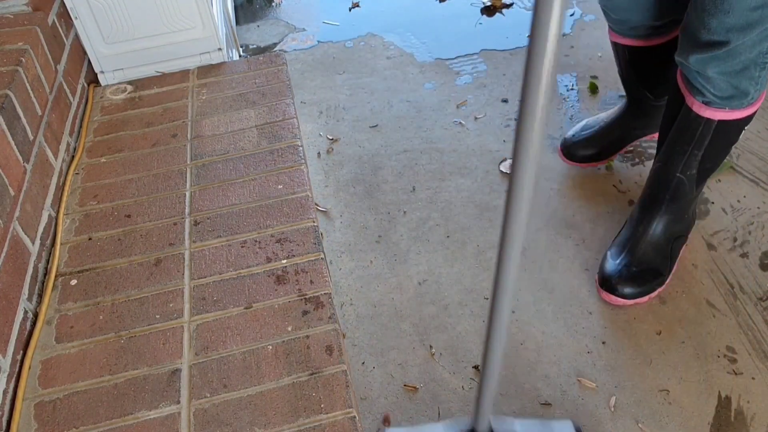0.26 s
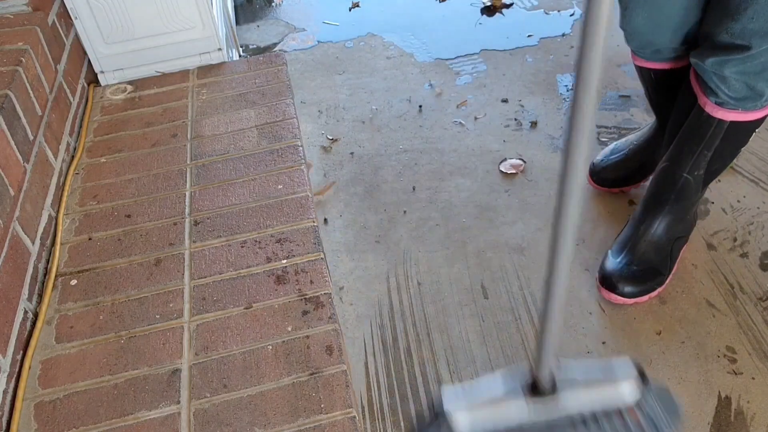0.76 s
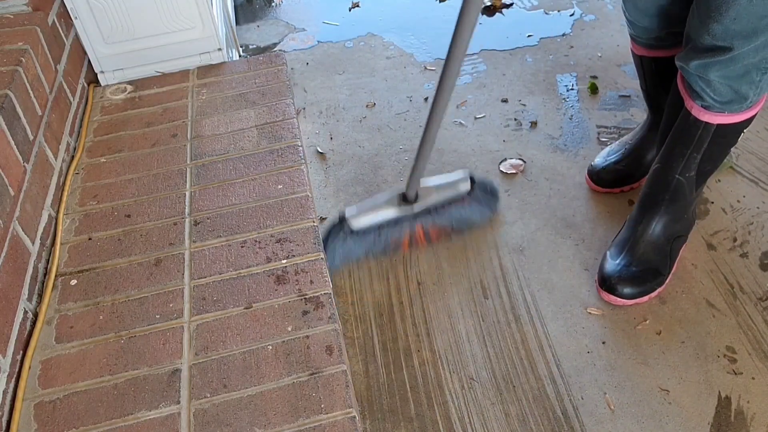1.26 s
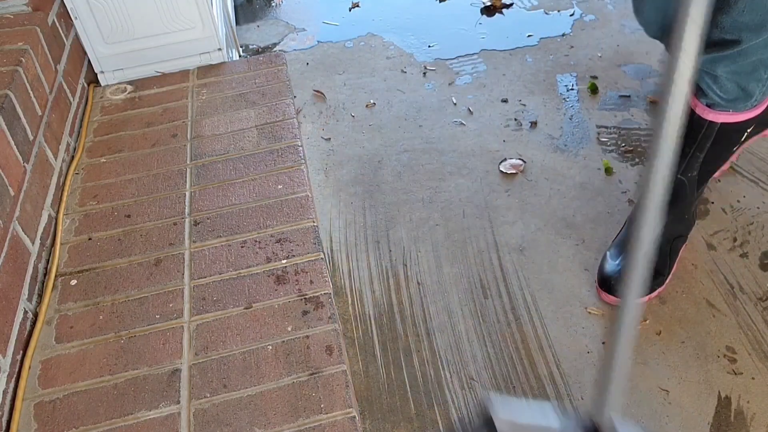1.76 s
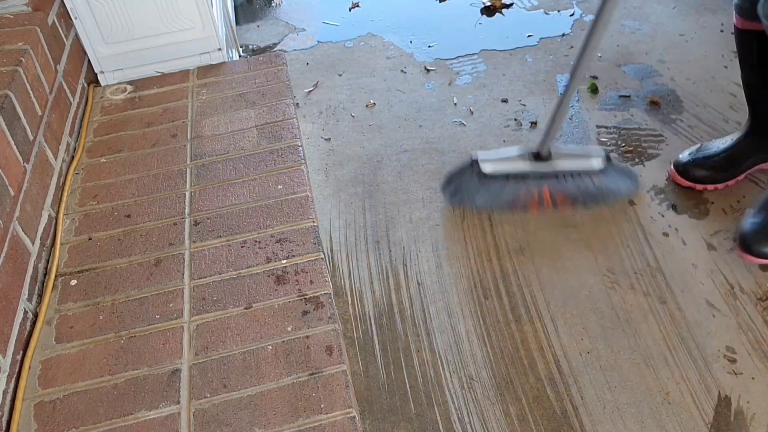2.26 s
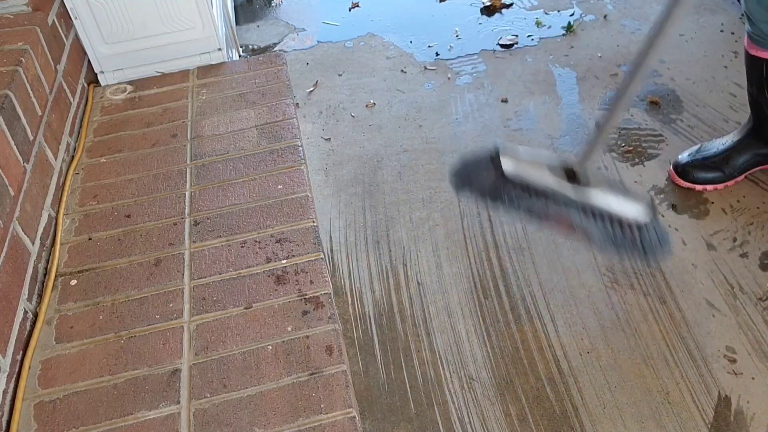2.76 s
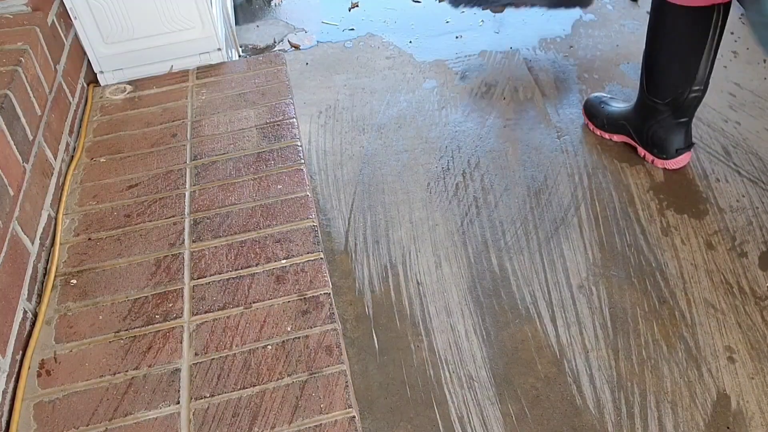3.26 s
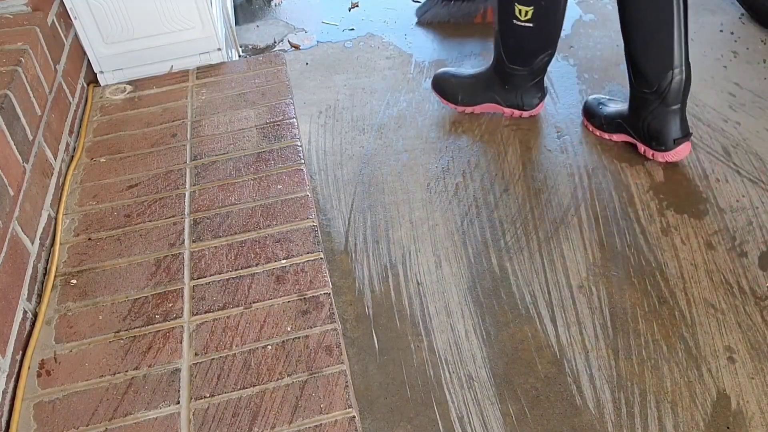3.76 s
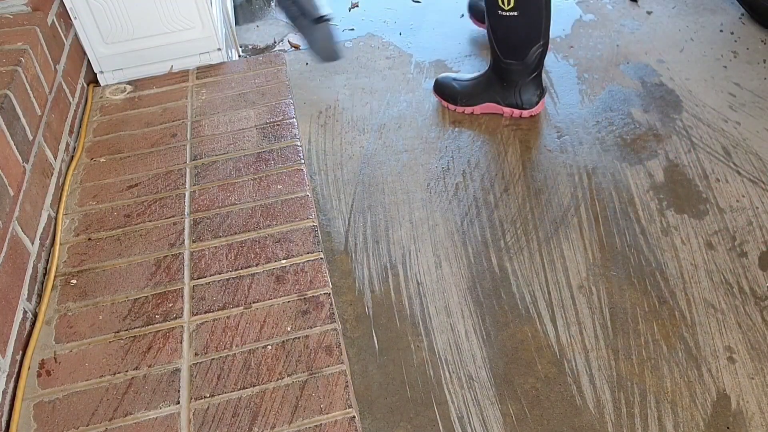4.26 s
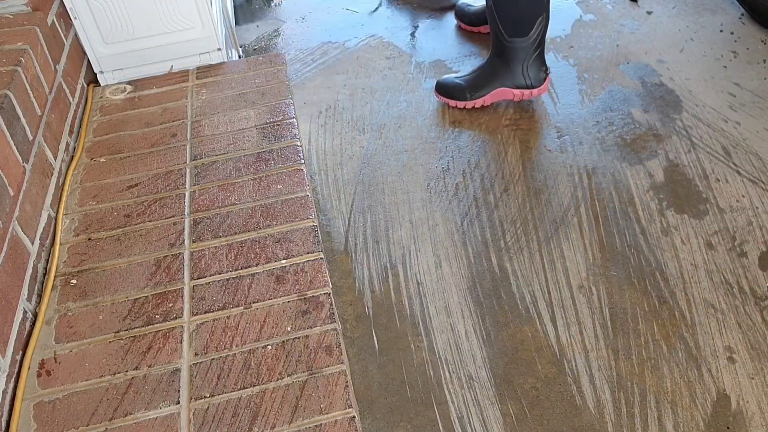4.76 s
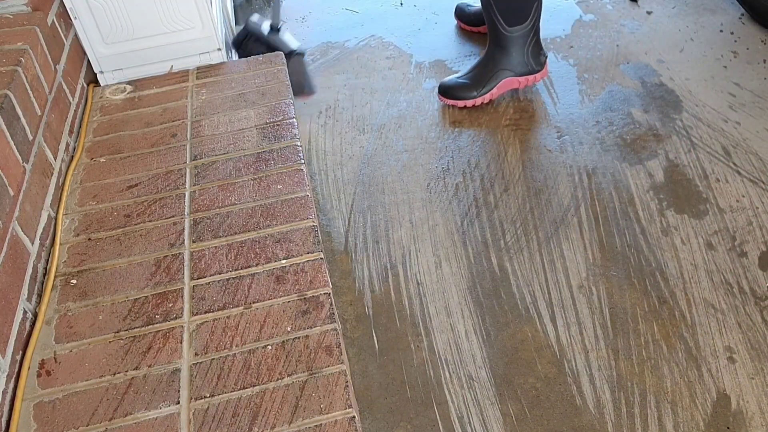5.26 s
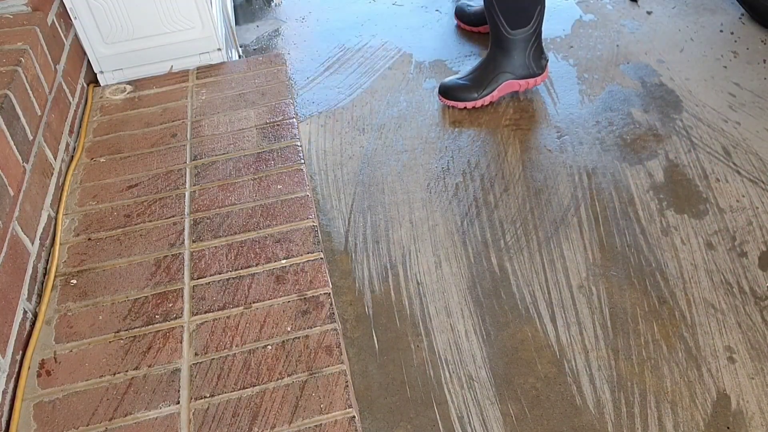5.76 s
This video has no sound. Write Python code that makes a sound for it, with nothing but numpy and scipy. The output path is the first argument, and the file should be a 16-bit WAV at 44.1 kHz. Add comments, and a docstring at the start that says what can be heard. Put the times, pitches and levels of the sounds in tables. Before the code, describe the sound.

Close to the microphone, a stiff push broom sweeps wet concrete in separate strokes, hissing brightly with fine spray. Early on, the head knocks hard in a quick clatter with a short metallic ring. Wet slaps and squelches follow, and the later strokes sound wetter and stronger. Rubber boots shuffle softly; low air puffs and a quiet outdoor wash lie beneath.

```python
"""A push broom sweeps water over wet concrete on a patio, stroke after stroke, close to the microphone.
Bristles hiss as ticks and noise; spray and slosh are mostly tiny bubbles and noise, with slaps and squelches.
The head knocks and the metal handle rings: decaying tones, in one tight cluster and faintly near the end.
Rubber boots shuffle in short noise bursts, low air noise buffets the microphone over a steady yard wash,
and the sound drops out for an instant between two strokes."""
import sys
import numpy as np
from scipy import signal
from scipy.fft import rfft, irfft
from scipy.io import wavfile

SR = 44100
rng = np.random.default_rng(int(sys.argv[2]) if len(sys.argv) > 2 else 0)


def bounce(signal):
    """Save signal as a 16-bit WAV file at the path given by the first command-line argument."""
    frames = np.transpose(np.atleast_2d(signal))
    limited = np.clip(frames, -1, 1)
    pcm = np.round(limited * 32767).astype(np.int16)
    wavfile.write(sys.argv[1], SR, pcm)


N = 264600  # samples: six seconds
T, HZ = np.arange(N) / SR, np.fft.rfftfreq(N, 1 / SR)  # time in s, frequency in Hz

# Where marked "relative", a level is set against others in its layer; a trim on the whole layer follows.
# Strokes of the broom, from touch-down to lift, relative: start_s, attack_s, push_s, follow_through_s,
# peak_db, swell_db (start below peak), ease_db (end below peak), spray_db and slosh_db (against bristles)
STROKES = [(.36, 0.071, 0.37, 0.11, -44, 8, 8, 2, -19), (1.28, 0.063, 0.29, 0.17, -45.5, 1, 6, -6, -10),
           (2.3, 0.092, 0.34, 0.26, -43.5, 1.5, 10, -5, -20),
           (3.24, .02, 0.041, 0.22, -42.5, 5, 20, -7.5, -21.5),
           (3.83, 0.1, .3, 0.11, -43.5, 19.5, 7, -8, -15),
           (4.294, 0.016, 0.057, .03, -53, 1.5, 3.5, 4.5, 2.5),
           (4.68, 0.063, 0.37, 0.16, -39.5, 26, 9, 2, -13), (5.68, .06, 0.43, .15, -40, 8, 8, 2.5, -21)]
LIFT_S = 0.048  # a stroke dies away as the bristles lift
# Fizz of the wet floor between strokes, relative: time_s, level_db
FILM_FIZZ = [(0, -67.5), (.35, -68.5), (1.0, -64.5), (1.9, -68.5), (3.1, -63), (3.7, -77), (4.6, -74),
             (5.4, -63), (5.62, -67)]
FILM_SPRAY_DB, FILM_SLOSH_DB = -1, 0  # against the fizz
# The head ploughs through deeper water, relative: time_s, slosh_db, spray_db, half_length_s
PUDDLES = [(0.72, -53.5, -64, 0.052), (1.523, -52, -66, 0.046), (2.587, -48, -30, 0.014),
           (2.71, -49.5, -58, 0.048), (2.87, -56, -48.5, 0.023), (4.177, -44.5, -43.5, 0.032),
           (4.252, -45.5, -45.5, 0.032), (5.084, -41, -37, 0.033), (5.168, -54.5, -48, 0.056),
           (5.285, -52, -60, 0.025), (5.96, -54, -50, 0.06)]
# Tone colour of the bristle hiss: pitch_hz, level_db (per Hz)
BRISTLE_COLOUR = [(500, -38), (1200, -33), (2500, -17.5), (3500, -9.5), (4500, -3), (7400, 0), (9000, -2),
                  (11000, -2), (13500, 0.5), (15500, -1)]
# Tone colour of the thrown spray: pitch_hz, level_db (per Hz)
SPRAY_COLOUR = [(1500, -40), (3000, -13.5), (4000, -5.5), (5300, 0), (6400, -2), (7400, 1), (8800, -6.5),
                (11000, -25), (16000, -26)]
# Tone colour of the sloshing water: pitch_hz, level_db (per Hz)
SLOSH_COLOUR = [(400, -29), (1100, -9.5), (1700, -9), (2200, -2.5), (2750, -4), (3200, 0), (4000, -1.5),
                (5200, 0), (9000, -25.5)]
# How much louder the left port hears the broom at full lean: pitch_hz, lead_db
LEFT_LEAD = [(500, 6), (3000, 1), (8000, 1.5), (11000, -2), (14000, 6)]
# The bristles catch and judder, shaking the broom hard: time_s, level_db, half_length_s
JUDDERS = [(0.419, -58.5, 0.045), (0.566, -51, 0.035), (1.372, -41.5, 0.033), (2.27, -55, 0.012),
           (3.95, -60.5, 0.03)]
HEAD_SHAKE_DB = -9  # a judder also rings the plastic head, against the handle
SHAKE_DB, BITE_DB, BITE_DECAY_S = -66, 4.5, 0.13  # the handle hums in every stroke, most at first bite
# Wet bristles slap the floor, relative: time_s, level_db, pitch_hz (band centre), decay_s
SLAPS = [(.381, -43, 9800, 0.014), (.962, -59.5, 7000, 0.0082), (1.133, -53, 5000, 0.018),
         (1.408, -36.5, 5000, .014), (2.023, -47.5, 7800, 0.0089), (2.118, -54, 8200, 0.005),
         (2.263, -41.5, 9000, 0.012), (2.599, -24, 9250, .006), (2.84, -46, 6000, 0.013),
         (2.96, -52.5, 11130, 0.014), (3.051, -56, 6950, 0.0055), (3.125, -48, 7500, 0.01),
         (4.482, -57, 7000, 0.027), (5.651, -46.5, 6300, 0.045)]
SLAP_OCTAVES, SLAP_RISE_S = 1.3, 0.0039
# Water squirts from under the bristles, relative: time_s, level_db, pitch_hz (band centre), decay_s
SQUELCHES = [(2.684, -37.5, 7000, .023), (2.925, -47, 5840, .012), (4.365, -45, 6600, .026),
             (5.012, -34.5, 6800, 0.021), (5.062, -26, 6100, .0062), (5.101, -32, 5520, .0076),
             (5.452, -55.5, 7000, .018)]
SQUELCH_OCTAVES, SQUELCH_RISE_SHARE = 0.31, 0.25  # the rise takes this share of the decay time
# The broom knocks and rattles: time_s, head_db, handle_db (strength of the blow to each)
KNOCKS = [(1.3412, -20, -41), (1.3458, -47, -32), (1.366, -28.5, -31), (1.373, -34, -23.5),
          (1.383, -31.5, -45.5), (1.402, -32, -23), (1.4058, -32, -8), (1.408, -26, -30), (1.421, -43, -32),
          (1.435, -41, -33), (1.471, -36.5, -38), (5.659, -54, -64)]
# Ringing tones of the plastic head: pitch_hz, level_db, t60_s (time to fall by 60 dB)
HEAD_MODES = [(175, -13.5, 0.111), (319, -24, 0.074), (422, -9, 0.0645), (532, -6, 0.026),
              (615, 2.5, 0.018), (852, -1, 0.014), (910, -14, 0.26), (952, -0.5, 0.014),
              (1210, -18.5, 0.0343), (1435, -6.5, .04), (3140, -4, 0.019), (4080, -7.5, 0.0145)]
# Ringing tones of the metal handle: pitch_hz, level_db, t60_s (time to fall by 60 dB)
HANDLE_MODES = [(1543.5, 1, 0.051), (1650, -20.5, 0.035), (1480, -23.5, 0.33), (1724, -24.5, 0.29),
                (1716, -31.5, 0.46), (1905, -14, 0.052), (2014, -13, .04), (2644, -12.5, 0.038),
                (2790, -24, 0.043), (3440, -13, 0.027), (3600, -18, 0.026), (3787, -9.5, 0.06),
                (4280, -21.5, 0.0793), (5520, -21, 0.0256), (5700, -28, 0.043), (6000, -38, 0.01)]
# Rubber boots tread and shuffle, relative: time_s, heel_thud_db, sole_scuff_db, grit_crunch_db, decay_s
TREADS = [(0.019, -56, -67, -63, 0.029), (.18, -60, -61, -70, 0.033), (.54, -55.5, -58, -74, 0.042),
          (1.14, -76, -61, -71, 0.043), (2.72, -67, -62.5, -68.5, 0.078), (3.129, -57, -63.5, -70, 0.043),
          (4.16, -60, -67, -60, 0.067), (4.768, -55, -59, -55, 0.017), (5.662, -44.5, -50.5, -52.5, .031)]
THUD_HZ, SCUFF_HZ, CRUNCH_HZ = 169.7, 530, 1324  # band centres
THUD_OCTAVES, SCUFF_OCTAVES, CRUNCH_OCTAVES = 0.33, 0.4, 1.3
TREAD_RISE_SHARE = 0.25  # of the decay time
# Ring of the house wall and patio: pitch_hz, t60_s
PATIO_RING = [(150, 0.58), (600, 0.27), (1600, 0.17), (4000, 0.11), (12000, 0.08)]
# Puffs of air on the microphone: time_s, level_db, half_length_s
GUSTS = [(0.154, -46.5, 0.13), (.48, -45.5, .05), (.96, -49.5, 0.029), (1.348, -54, 0.0299),
         (1.666, -47, .08), (1.883, -49, .03), (2.09, -50, 0.025), (2.202, -47.5, 0.033),
         (2.455, -54.5, 0.066), (3.254, -47, 0.067), (4.795, -51.5, 0.099), (5.336, -50, 0.066),
         (5.771, -39, .025), (5.926, -51, 0.1)]
BREEZE_DB = -56  # middle level of the air between puffs
# Tone colour of the air on the microphone: pitch_hz, level_db (per Hz)
RUMBLE_COLOUR = [(12, -48.5), (25, -10.5), (45, 3), (70, 2), (105, -4), (150, -12), (250, -35), (600, -62)]
# Tone colour of the steady outdoor background: pitch_hz, level_db (per Hz)
YARD_COLOUR = [(70, -11), (130, -13), (250, -4.5), (330, -1), (460, -7), (720, -6), (900, -10.5),
               (1100, -13), (2300, -14), (6000, -19), (15500, -33)]
YARD_DB = -59.5  # middle level of the background
# Likeness of left and right: pitch_hz, likeness (-1 to 1, no unit)
LIKENESS = [(60, 0.74), (200, 0.83), (600, 0.62), (1400, 0.1), (3000, 0.013), (8000, -0.032),
            (15000, 0.073)]
EDGE_HZ = 15900  # upper limit of the sound


def sweeping():
    """Bristles flick over the grit, shake the broom, and whip the water into spray and bubbles."""
    bristle_gain, spray_gain, slosh_gain, hum = effort()
    grit = amp(0.65 * wander(per_s=35))  # the rough floor catches all bristles at once
    flicks = unit(ticks(per_s=12000, spread_db=2.0)) + noise()
    hiss = amp(5.0) * bristle_gain * coloured(flicks, BRISTLE_COLOUR, lead=0.76)
    fizz = bubbles(low_hz=3094, high_hz=11050, per_s=5300, cycles=6, spread_db=0.5, clump_db=0.9)
    fizz = fizz + 0.8 * noise()
    spray = amp(-0.55) * spray_gain * coloured(fizz, SPRAY_COLOUR, lead=0.25)
    froth = bubbles(low_hz=1400, high_hz=5450, per_s=4300, cycles=7, spread_db=1.0, clump_db=3.5)
    froth = froth + 1.37 * noise()
    slosh = amp(3.0) * slosh_gain * coloured(froth, SLOSH_COLOUR)
    handle = (hum + judders()) * shaken(HANDLE_MODES)
    head = amp(HEAD_SHAKE_DB) * judders() * shaken(HEAD_MODES)
    return grit * (hiss + spray + slosh), handle + head


def effort():
    """Gains of hiss, spray, slosh and handle hum: strokes over a fizzing wet floor, with puddles on the way."""
    rub, thrown, pushed, hum = np.sum([stroke(*row) for row in STROKES], axis=0)
    spray = [thrown, film() * amp(FILM_SPRAY_DB)]
    slosh = [pushed, film() * amp(FILM_SLOSH_DB)]
    for time_s, slosh_db, spray_db, half_length_s in PUDDLES:
        spray.append(hump(time_s, spray_db, half_length_s))
        slosh.append(hump(time_s, slosh_db, half_length_s))
    return together([rub, film()]), together(spray), together(slosh), hum


def stroke(start, attack, push, follow, peak_db, swell_db, ease_db, spray_db, slosh_db):
    """The bristles land, gather speed, ease off and lift: gains of hiss, spray, slosh and handle hum."""
    age = np.maximum(T - start, 0)
    landing = np.minimum(age / attack, 1) ** 2
    lifting = np.exp(-np.maximum(age - push - follow, 0) / LIFT_S)
    contact = landing * lifting
    below_peak_db = np.interp(age, [0, push, push + follow], [swell_db, 0, ease_db])
    hiss = contact * amp(peak_db - below_peak_db)
    hum = contact * amp(SHAKE_DB + BITE_DB * np.exp(-age / BITE_DECAY_S))
    return hiss, hiss * amp(spray_db), hiss * amp(slosh_db), hum


def film():
    """Gain of the fizz on the wet floor."""
    return amp(np.interp(T, *np.transpose(FILM_FIZZ)))


def judders():
    """Gain of the chatter when the bristles catch."""
    return sum(hump(*row) for row in JUDDERS)


def shaken(modes):
    """A body rings under a dense, uneven rain of tiny bristle blows."""
    blows = ticks(per_s=900, spread_db=1.5)
    return unit(signal.oaconvolve(blows, ringing(modes)[None], axes=1)[:, :N])


def glancing(x, strength, drift_s, count=6):
    """Echoes off floor, wall and boots shift as the broom travels, combing the hiss with drifting notches."""
    out = x.copy()
    fine_index = np.arange(4 * N) / 4  # four steps per sample let the delays glide
    for delay in np.geomspace(0.0005, 0.009, count):
        path = T - delay - drift_s * wander(per_s=1.086)
        echo = [np.interp(path * SR, fine_index, signal.resample_poly(port, 4, 1)) for port in x]
        out += strength * np.array(echo)
    return out / np.sqrt(1 + count * strength ** 2)


def splashing():
    """Broad slaps of wet bristles and narrow squelches of squeezed water."""
    out = np.zeros((2, N))
    for time_s, level_db, pitch_hz, decay_s in SLAPS:
        add(out, *burst(time_s, level_db, pitch_hz, SLAP_OCTAVES, SLAP_RISE_S, decay_s))
    for time_s, level_db, pitch_hz, decay_s in SQUELCHES:
        rise_s = SQUELCH_RISE_SHARE * decay_s
        add(out, *burst(time_s, level_db, pitch_hz, SQUELCH_OCTAVES, rise_s, decay_s))
    return out


def trickle():
    """Small drips and bursting bubbles go on in the wet film, following the level of its fizz."""
    drips = bubbles(low_hz=2407, high_hz=11000, per_s=160, cycles=5.9, spread_db=2.5, clump_db=-3, count=10)
    return amp(-8) * film() * drips


def knocking():
    """Each blow rings the head and the handle, with a short crack; it reaches the left port first."""
    head, handle, out = ringing(HEAD_MODES), ringing(HANDLE_MODES), np.zeros(N)
    t = np.arange(len(head)) / SR
    crack_band = signal.butter(1, [1200, 6000], "band", fs=SR, output="sos")
    for time_s, head_db, handle_db in KNOCKS:
        crack = signal.sosfilt(crack_band, rng.standard_normal(len(t))) * np.exp(-t / 0.0037)
        head_blow = amp(head_db) * (head + amp(-11.5) * crack)
        handle_blow = amp(handle_db) * (handle + amp(-22) * crack)
        add(out, time_s, head_blow + handle_blow)
    # so small a body radiates little bass
    out = signal.sosfilt(signal.butter(2, 150, "high", fs=SR, output="sos"), out)
    return np.array([out, amp(-1.5) * np.roll(out, 6)])  # right: softer and 6 samples later


def ringing(modes):
    """What one blow leaves ringing in a body; neighbouring tones swing in opposite directions."""
    t = np.arange(SR // 2) / SR
    out = np.zeros(len(t))
    for k, (pitch_hz, level_db, t60_s) in enumerate(modes):
        out += (-1) ** k * amp(level_db - 60 * t / t60_s) * np.sin(2 * np.pi * pitch_hz * t)
    return out


def boots():
    """Each tread is a thud of the heel, a scuff of the sole and a crunch of grit; slow treads also start softly."""
    out = np.zeros((2, N))
    bands = [(THUD_HZ, THUD_OCTAVES), (SCUFF_HZ, SCUFF_OCTAVES), (CRUNCH_HZ, CRUNCH_OCTAVES)]
    for time_s, *levels, decay_s in TREADS:
        for level_db, (pitch_hz, octaves) in zip(levels, bands):
            add(out, *burst(time_s, level_db, pitch_hz, octaves, TREAD_RISE_SHARE * decay_s, decay_s))
    return out


def patio(x):
    """Sparse reflections from wall and floor, each band dying at its own speed."""
    size = SR // 2
    taps = rng.choice([-1., 1.], (2, size)) * (rng.random((2, size)) < 2500 / SR)  # 2500 a second
    taps *= np.arange(size) > 0.006 * SR  # none in the first 6 ms
    hz, t, z = signal.stft(taps, SR, nperseg=256)
    fade = amp(-60 * t / read(PATIO_RING, hz)[:, None])
    tail = signal.istft(z * fade, SR, nperseg=256)[1]
    return signal.fftconvolve(x, tail / np.linalg.norm(tail[0]), axes=1)[:, :N]


def outdoors():
    """Lumps of low air noise over the steady wash of the yard."""
    breeze = amp(BREEZE_DB + 1.3 * wander(per_s=6.6))
    air_gain = together([breeze] + [hump(*row) for row in GUSTS])
    air = air_gain * coloured(noise(), RUMBLE_COLOUR)
    yard = amp(YARD_DB + 1.6 * wander(per_s=33)) * coloured(noise(), YARD_COLOUR)
    return air + yard


def bubbles(low_hz, high_hz, per_s, cycles, spread_db, clump_db, count=24):
    """Tiny bubbles ring and rise in pitch; each size comes in clumps."""
    t, out = np.arange(1024) / SR, np.zeros((2, N))
    for hz in np.geomspace(low_hz, high_hz, count):
        age = t * hz / cycles
        ring = np.exp(-age) * np.sin(2 * np.pi * hz * t * (1 + 0.018 * np.minimum(age, 4)))
        clumps = np.interp(T, np.linspace(0, N / SR, 120), rng.standard_normal(120))
        births = ticks(per_s / count, spread_db) * amp(clump_db * clumps)
        out += signal.oaconvolve(births, unit(ring)[None], axes=1)[:, :N]
    return unit(out)


def burst(s, db, centre_hz, octaves, rise, decay):
    """A short swell of noise in one band, peaking at time s: its start and its sound."""
    t = np.arange(SR // 2) / SR
    hz = np.fft.rfftfreq(len(t), 1 / SR) + 1
    z = paired(rfft(rng.standard_normal((2, len(t)))), hz)
    band = np.exp(-0.5 * (np.log2(hz / centre_hz) / octaves) ** 2)
    hiss = unit(irfft(z * band, len(t)))
    start = max(s - np.pi * rise, 0)
    age = t + start - s  # negative before the peak
    shape = np.exp(-0.5 * (np.minimum(age, 0) / rise) ** 2 - np.maximum(age, 0) / decay)
    return start, amp(db) * hiss * shape


def ticks(per_s, spread_db):
    """Random impulses, mostly small and a few large, each shared unevenly between the ports."""
    size = amp(spread_db * np.minimum(rng.exponential(1, N), 4))
    return noise() * size * (rng.random(N) < per_s / SR)


def noise():
    """White noise, one row for each port."""
    return rng.standard_normal((2, N))


def wander(per_s):
    """Slow random drift of unit size."""
    return unit(irfft(rfft(rng.standard_normal(N)) * np.exp(-(HZ / per_s) ** 2), N))


def hump(s, db, length):
    """A smooth rise and fall in gain around time s."""
    return amp(db) * np.exp(-0.5 * ((T - s) / length) ** 2)


def together(gains):
    """Joint gain of unrelated noises: their powers add."""
    return np.sqrt(sum(g ** 2 for g in gains))


def coloured(x, colour, lead=0):
    """Gives a pair of signals a tone colour, a stereo likeness and a lean to the left."""
    lean_db = lead * read(LEFT_LEAD, HZ) * np.array([[0.5], [-0.5]])
    return unit(irfft(paired(rfft(x), HZ) * amp(read(colour, HZ) + lean_db), N))


def paired(z, hz):
    """Makes two unrelated spectra as alike as the two microphone ports hear them."""
    same = np.clip(read(LIKENESS, hz), -1, 1)
    return np.array([z[0], same * z[0] + np.sqrt(1 - same ** 2) * z[1]])


def read(points, hz):
    """Joins (Hz, value) points on a log-frequency axis."""
    f, value = np.transpose(points)
    return np.interp(np.log(hz + 1), np.log(f + 1), value)


def amp(db):
    """Decibels to gain."""
    return 10 ** (np.asarray(db) / 20)


def unit(x):
    """Scales to an rms (average strength) of one."""
    return x / np.sqrt(np.mean(x ** 2) + 1e-20)


def add(mix, s, sound):
    """Mixes a sound in from time s."""
    part = mix[..., max(round(s * SR), 0):][..., :sound.shape[-1]]
    part += sound[..., :part.shape[-1]]


def scene():
    """Broom, water and boots on the patio, with echoes and outdoor air."""
    swish, body = sweeping()
    swish = glancing(swish, strength=0.22, drift_s=0.0002994)
    knock = knocking()
    wet = (splashing() + trickle()) * amp([[2.5], [0.5]])  # left, right trim in dB
    echo = patio(amp(-11) * knock + amp(-6) * wet)
    return swish + body + knock + wet + amp(3.5) * boots() + echo + outdoors()


def record(dry):
    """The sound drops out for about a twenty-fifth of a second; then the top of the treble is cut."""
    live = np.interp(T, [3.222, 3.226, 3.24, 3.2625, 3.264], [1, 0.15, 0, 0, 1])
    lowpass = signal.firwin(511, EDGE_HZ, window=("kaiser", 9), fs=SR)
    return signal.oaconvolve(dry * live, lowpass[None], "same")


dry = scene()
out = record(dry)
bounce(out)
```